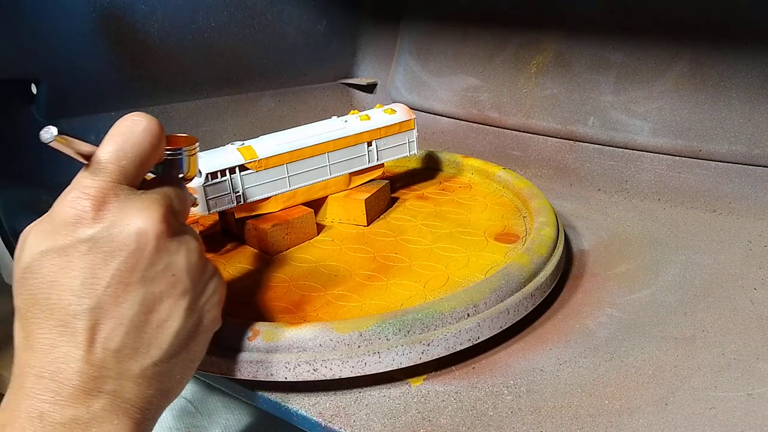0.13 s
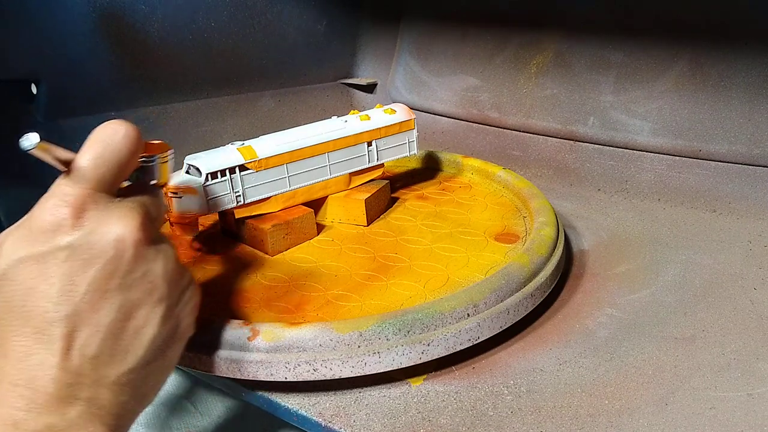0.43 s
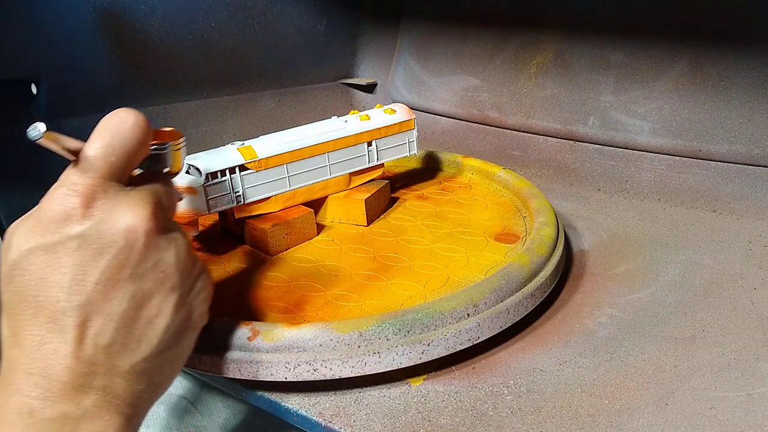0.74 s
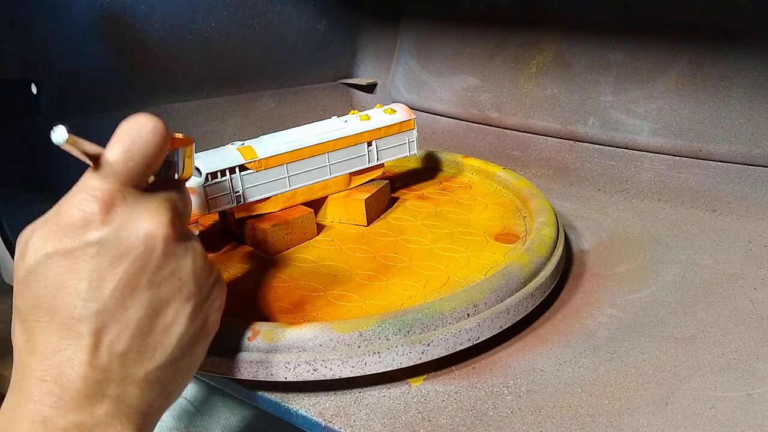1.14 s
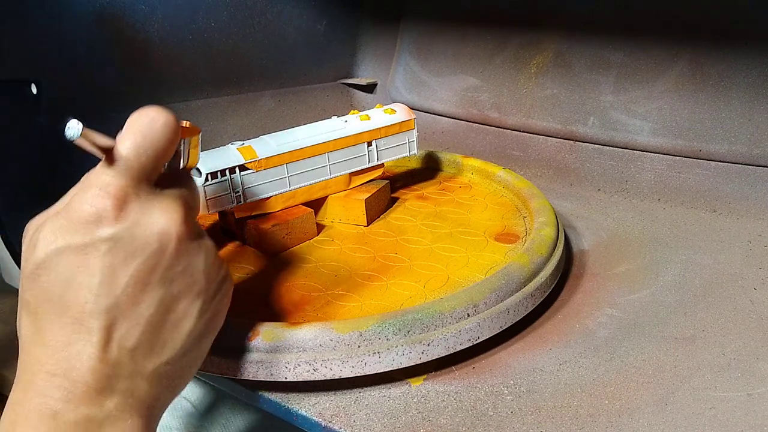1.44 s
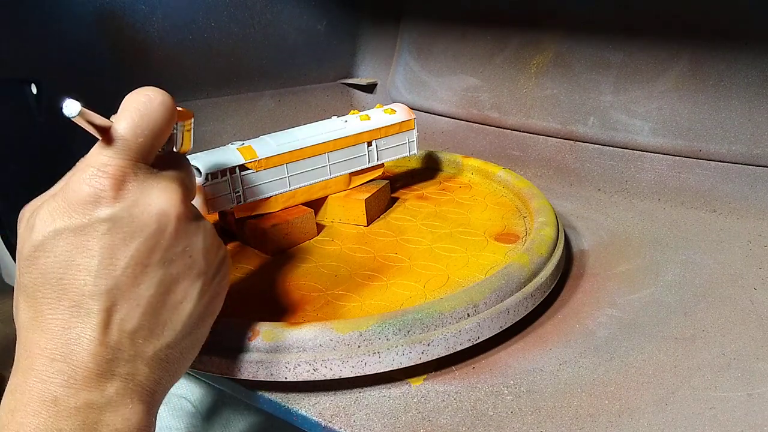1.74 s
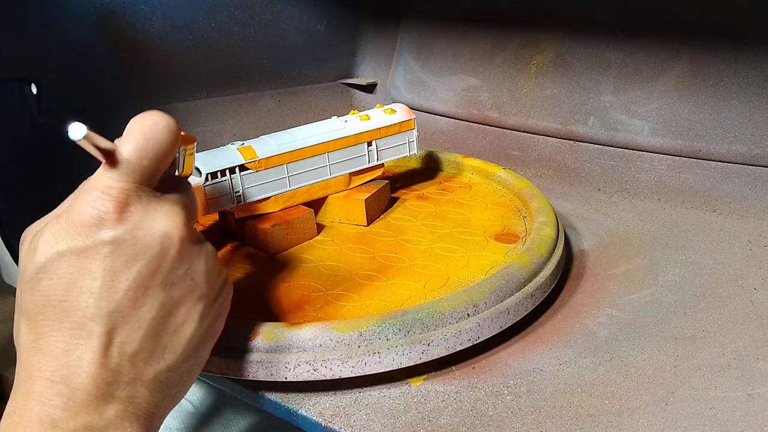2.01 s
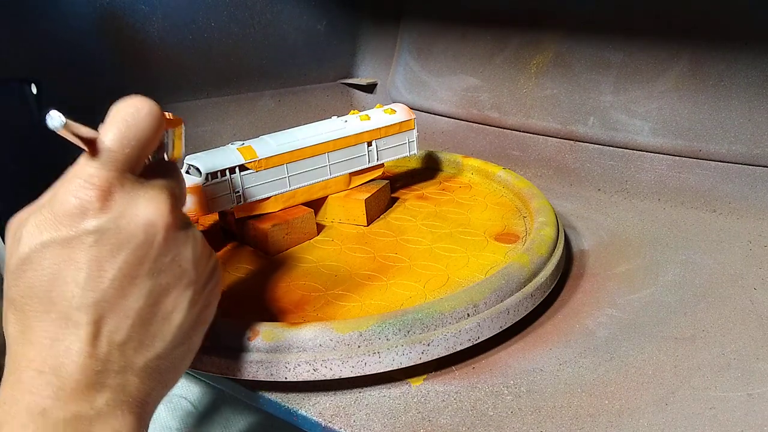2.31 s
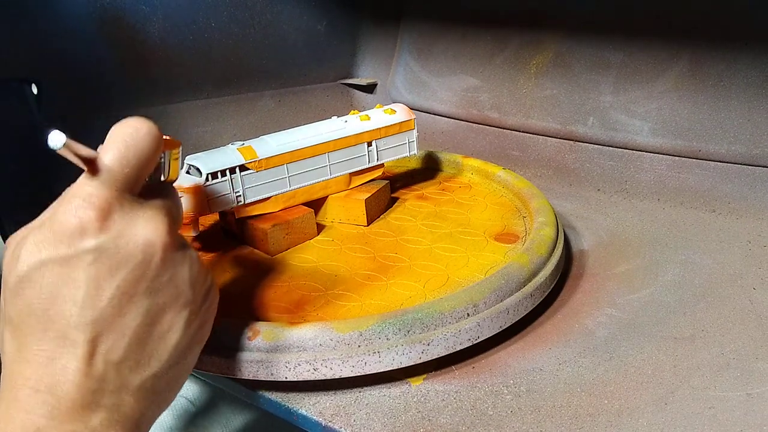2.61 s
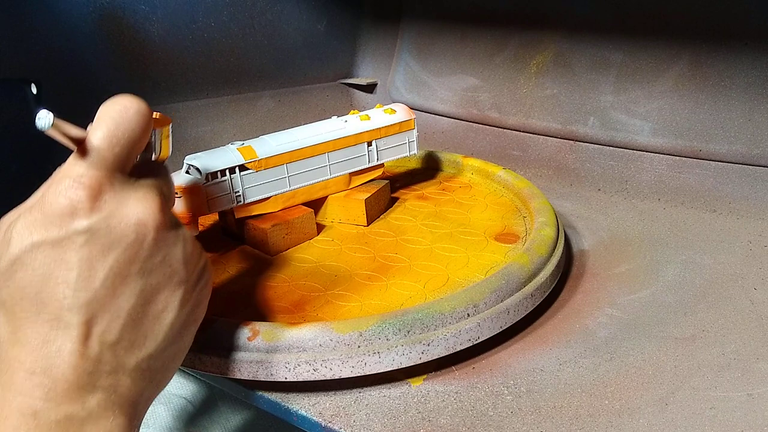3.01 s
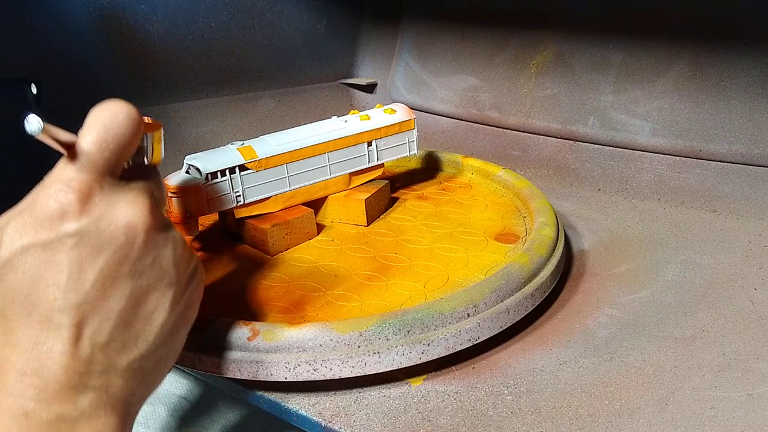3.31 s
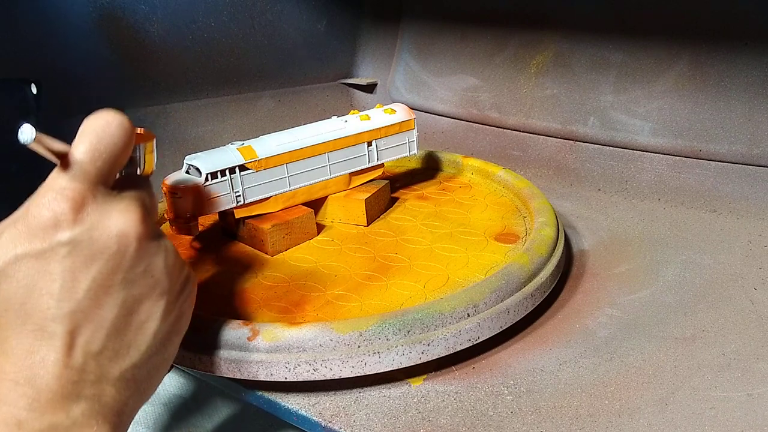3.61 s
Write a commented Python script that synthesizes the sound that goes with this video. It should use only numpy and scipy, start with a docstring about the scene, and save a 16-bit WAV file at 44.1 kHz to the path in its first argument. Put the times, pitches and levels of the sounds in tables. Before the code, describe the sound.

An airbrush hisses steadily inside a small spray booth over rushing air and a low hum.

```python
"""Air rushes through a small spray booth over a compressor's low hum, with the hiss of an airbrush close by.
The rush is noise shaped by booth resonances; the hum is a series of wavering harmonics.
The hiss is broadband jet noise with a sliding bright band, coloured by near reflections that shift with
the hand. The jet flares as it catches edges of the model being sprayed and rings across its hollow cab.
All the noise reaches a pair of microphones with a level, phase and coherence that depend on frequency."""
import sys
import numpy as np
from scipy import signal
from scipy.fft import rfft, irfft
from scipy.io import wavfile
from scipy.ndimage import map_coordinates

SR = 44100
rng = np.random.default_rng(int(sys.argv[2]) if len(sys.argv) > 2 else 0)


def transcribe(u):
    """Save the signal u as a 16-bit wav file named by the first command-line argument.

    u: samples, shape (n,) or (channels, n), limited to [-1, 1]; the rate is SR.
    q: integer samples, one column per channel.
    """
    v = np.clip(np.atleast_2d(u).T, -1, 1)
    q = np.round(v * 32767).astype(np.int16)
    wavfile.write(sys.argv[1], SR, q)


N = 165375  # samples, 3.75 s

# Compressor harmonics. Each row: multiple of the fundamental, relative left level in dB,
# relative right level in dB, phase lead of left over right in radians.
HUM_HARMONICS = [(1, -32.5, -43, -1.61), (2, -42.5, -51, -1.15), (3, -51, -51, 0.9), (4, -56.5, -68, -2.8),
                 (7, -60, -65, -0.14)]
# Slow course of the hum. Each row: time in seconds, relative level in dB.
HUM_COURSE = [(0.0, -43), (0.31, -38), (0.34, -40.5), (1.39, -39.5), (1.58, -40), (2.64, -41),
              (2.65, -42.5), (3.49, -42), (3.54, -41), (3.75, -43)]
# Spectrum of the rushing air. Each row: frequency in Hz, relative density in dB per Hz.
RUSH_SPECTRUM = [(20, -55), (45, -34), (65, -16), (100, -9), (135, -1), (205, 1), (310, -6), (520, -10.5),
                 (800, -10.5), (1150, -7.5), (1420, -14.5), (1680, -13.5), (2000, -20.5), (3000, -22),
                 (4300, -31), (8000, -37)]
# Slow course of the rush. Each row: time in seconds, relative level in dB.
RUSH_COURSE = [(0.0, -38.5), (0.3, -36.5), (0.34, -38.5), (0.49, -37.5), (0.55, -40.5), (0.74, -37.5),
               (0.81, -36.5), (0.85, -39), (1.21, -38), (1.36, -36), (1.51, -38.5), (2.35, -39),
               (2.5, -37.5), (2.6, -39.5), (2.75, -41.5), (2.88, -37.5), (2.92, -41.5), (3.1, -39),
               (3.75, -39.5)]
# Booth resonances and hollows. Each row: centre in Hz, width in Hz at half the lift, lift in dB.
BOOTH_MODES = [(396.6, 30, 5.5), (723.3, 24.4, 8.5), (760, 31, -2.5), (906, 36, 4), (952, 93, 4),
               (1067, 23, -4.5), (1120, 46, 1.5), (1298, 40, 5), (1472, 23, 4.5), (1605, 40, 4),
               (2420, 130, 4.5), (2714, 60, 4.5), (3820, 300, 2.5)]
# Spectrum of the jet on an edge. Each row: frequency in Hz, relative density in dB per Hz.
EDGE_SPECTRUM = [(400, -18), (1000, -18), (1500, 1), (2000, 7.5), (2550, 1), (3150, -2), (3800, -2.5),
                 (4400, -14), (6000, -19), (9000, -14.5), (15000, -40)]
# Resonances of the hollow cab. Each row: centre in Hz, width in Hz, relative peak level in dB.
CAB_RESONANCES = [(2650, 410, -1), (3673, 220, 0), (4130, 200, -2), (4580, 260, -2), (5800, 3000, -13.5)]
# Jet meeting an edge. Each row: centre in seconds, half length in seconds, level in dB,
# level of the cab's ring relative to that in dB.
EDGE_FLARES = [(0.132, 0.073, -40.5, -10.5), (0.488, 0.035, -38.2, -16), (0.651, 0.078, -44, -3),
               (0.892, 0.06, -43.5, -22), (1.29, 0.03, -38.5, -18), (1.43, 0.12, -43, -25),
               (1.79, 0.028, -42.5, -7), (2.137, 0.14, -44.5, -20), (2.286, 0.15, -48, -22),
               (3.138, 0.04, -45, -3), (3.5, 0.037, -39, -2.5), (3.57, 0.045, -43, -2.5),
               (3.639, 0.03, -40, -3)]
# Spectrum of the nozzle hiss. Each row: frequency in Hz, relative density in dB per Hz.
HISS_SPECTRUM = [(1500, -2.5), (3500, -5.5), (5500, 2), (7300, -1.5), (8800, -2.5), (10500, 2.5),
                 (12300, 2.5), (13400, 0), (14400, 0), (15300, -3)]
# Slow course of the hiss. Each row: time in seconds, relative level in dB.
HISS_COURSE = [(0.0, -52.5), (1.2, -54), (1.29, -51), (1.48, -53.5), (2.05, -54), (2.11, -52),
               (2.66, -54.5), (2.74, -55.5), (2.87, -55), (2.9, -55.5), (3.24, -53.5), (3.33, -57.5),
               (3.63, -52.5), (3.69, -56.5), (3.75, -53)]
# Bright band that slides as the nozzle turns. Each row: time in seconds, centre in Hz, level in dB.
BRIGHT_BAND = [(0, 12200, -54), (.4, 12100, -60), (.8, 11700, -56), (1.35, 10560, -56.5), (1.7, 10340, -56),
               (2.2, 10160, -56.5), (2.7, 9680, -56), (3.2, 9650, -56), (3.75, 10400, -59)]
# Peaks of the topmost treble. Each row: centre in Hz, width in Hz, relative peak level in dB.
SIZZLE_PEAKS = [(14000, 2600, 0), (15300, 700, -1)]
# Slow course of the topmost treble. Each row: time in seconds, relative level in dB.
SIZZLE_COURSE = [(0.0, -53.5), (1.97, -59.5), (2.26, -56), (2.99, -59), (3.23, -56), (3.33, -60),
                 (3.64, -55), (3.7, -61), (3.75, -59)]
# Brighter spurts of spray. Each row: centre in seconds, half length in seconds, level in dB.
SPRAY_SPURTS = [(0.563, .05, -49.5), (0.704, 0.063, -52.5)]
# Gain of each near reflection: left in dB, right in dB.
REFLECTION_DB = (-10.5, -11.5)
# Right microphone against left. Each row: frequency in Hz, gain in dB, phase lag in radians, coherence 0-1.
MICROPHONE_PAIR = [(100, -5, -2.5, 0.94), (196, -9, -1, 0.89), (420, -4, -0.1, 0.58),
                   (570, -1.5, -0.6, 0.73), (780, -3, 0, 0.87), (1000, -2.5, 0, 0.96),
                   (1260, -0.9, 0.16, 0.97), (1500, 0.7, 0.88, 0.83), (1800, -2, 2.5, 0.61),
                   (2150, -1.3, 3, 1), (2570, -3, 4, 0.75), (2890, -3.5, 5, 0.57), (3320, -0.5, 6.5, 0.96),
                   (3690, -4.5, 6.95, 0.77), (4050, -2, 8, 0.75), (4330, -5.5, 8.5, 1),
                   (4940, -1, 10.5, 0.7), (5760, -5.5, 12.5, 0.6), (7600, -8.5, 17, 0.7),
                   (10460, -10, 24.5, 0.9), (15300, -7, 37.5, .68)]

# Offsets added to the level courses, in dB
HUM_DB, RUSH_DB, HISS_DB, SIZZLE_DB = 39, 5, 6, 3
# Random wander: typical depth in dB, rate in knots per second
HUM_WAVER_DB, HUM_WAVER_PER_S = 1, 6.15
RUSH_FLUTTER_DB, RUSH_FLUTTER_PER_S = 0.45, 14
HISS_FLUTTER_DB, HISS_FLUTTER_PER_S = 1.07, 24.94
FLARE_FLUTTER_DB, FLARE_FLUTTER_PER_S = 1, 45  # the jet flaps on the edge
HUM_HZ, HUM_DRIFT, HUM_DRIFT_PER_S = 119.96, .001, 2.02  # drift is a fraction of the pitch
RIPPLE_DB, RIPPLE_HZ, RIPPLE_FULL_HZ = 1.4, 21.88, 1200  # small booth modes: depth, spacing, onset
EDGE_STEEPNESS = 3.1  # exponent of the swell: higher is more abrupt
BAND_WIDTH_HZ = 2100
SPURT_HZ, SPURT_WIDTH_HZ = 6760, 4700
REFLECTIONS, ECHO_MIN_S, ECHO_SPREAD_S = 6, 0.000801, .005  # count per side, shortest delay, range
SWAY_S, SWAY_PER_S = .000025, 1.505  # the hand's sway: typical delay shift, knots per second
TOP_HZ = 15500

TIME_S = np.arange(N) / SR
BIN_HZ = np.maximum(np.arange(N // 2 + 1) * SR / N, 1)  # kept above zero for logs and ratios


def undb(db):
    """Amplitude ratio is ten to the power of decibels over twenty."""
    return 10 ** (np.asarray(db) / 20)


def curve(at, rows, axis=1):
    """Linear interpolation of one table column against the first."""
    rows = np.array(rows, float)
    return np.interp(at, rows[:, 0], rows[:, axis])


def colour(rows):
    """Spectral envelope: gain per bin, in decibels linear over log frequency."""
    points = [(np.log(hz), db) for hz, db in rows]
    return undb(curve(np.log(BIN_HZ), points))


def bell(hz, width):
    """Second-order resonance: gain falls with detuning, by 3 dB at the edges of the width."""
    detuning = (BIN_HZ / hz - hz / BIN_HZ) * hz / width
    return 1 / np.hypot(1, detuning)


def resonances(rows):
    """Superposition of squared resonance gains."""
    return sum(undb(db) * bell(hz, width) ** 2 for hz, width, db in rows)


def walk(rate):
    """Smooth random fluctuation: a spline through normal knots, with spread near 1."""
    knots = rng.standard_normal(256)
    return map_coordinates(knots, [TIME_S * rate + 2], mode="mirror")


def swell(centre, half):
    """Flat-topped exponential envelope: a quick rise, a hold and a quick fall."""
    return np.exp(-np.abs((TIME_S - centre) / half) ** EDGE_STEEPNESS / 2)


def microphones(shared, own):
    """Partial coherence: the right signal mixes the left's noise, shifted in phase, with its own."""
    gain = undb(curve(BIN_HZ, MICROPHONE_PAIR))
    lag = curve(BIN_HZ, MICROPHONE_PAIR, axis=2)
    coherence = np.clip(curve(BIN_HZ, MICROPHONE_PAIR, axis=3), 0, 1)
    mixed = coherence * shared + np.sqrt(1 - coherence ** 2) * own
    right = mixed * gain * np.exp(-1j * lag)
    pair = irfft(np.array([shared, right]), N)
    return pair / pair[0].std()


def turbulence(gain):
    """Turbulent flow radiates broadband noise, here white noise under a given spectral gain."""
    shared, own = (rfft(rng.standard_normal(N)) * gain for _ in range(2))
    return microphones(shared, own)


def compressor():
    """A periodic motor radiates harmonics of one fundamental, here with slight pitch and level wander."""
    pitch = HUM_HZ * (1 + HUM_DRIFT * walk(HUM_DRIFT_PER_S))
    phase = 2 * np.pi * np.cumsum(pitch) / SR
    hum = 0
    for multiple, left_db, right_db, lead in HUM_HARMONICS:
        turn = multiple * phase + 2 * np.pi * rng.random()
        left = undb(left_db) * np.sin(turn)
        right = undb(right_db) * np.sin(turn - lead)
        waver = undb(HUM_WAVER_DB * walk(HUM_WAVER_PER_S))
        hum = hum + np.sqrt(2) * np.array([left, right]) * waver  # root 2 turns RMS into peak
    return hum * undb(curve(TIME_S, HUM_COURSE) + HUM_DB)


def booth_colour():
    """Enclosure modes: a few strong resonances and hollows over a dense random ripple."""
    knots = rng.standard_normal(4096)
    ripple = map_coordinates(knots, [BIN_HZ / RIPPLE_HZ], mode="mirror")
    density = np.minimum(BIN_HZ / RIPPLE_FULL_HZ, 1)
    strong_db = sum(db * bell(hz, width) ** 2 for hz, width, db in BOOTH_MODES)
    return undb(strong_db + RIPPLE_DB * density * ripple)


def booth_rush(walls):
    """Flow noise filtered by the modes of the enclosure through which the air rushes."""
    flutter_db = RUSH_FLUTTER_DB * walk(RUSH_FLUTTER_PER_S)
    level = undb(curve(TIME_S, RUSH_COURSE) + RUSH_DB + flutter_db)
    return turbulence(colour(RUSH_SPECTRUM) * walls) * level


def flares(walls):
    """Edge noise and cavity resonance: the jet breaks on edges and blows across the hollow cab."""
    # overlapping flares add in power
    edge = sum((undb(db) * swell(at, half)) ** 2 for at, half, db, ring_db in EDGE_FLARES)
    ring = sum((undb(db + ring_db) * swell(at, half)) ** 2 for at, half, db, ring_db in EDGE_FLARES)
    broken_jet = turbulence(colour(EDGE_SPECTRUM) * walls) * np.sqrt(edge)
    cab = turbulence(resonances(CAB_RESONANCES) * walls) * np.sqrt(ring)
    return (broken_jet + cab) * undb(FLARE_FLUTTER_DB * walk(FLARE_FLUTTER_PER_S))


def sliding_noise(carrier):
    """Quadrature modulation moves low-pass noise up to the carrier; returns its spectrum."""
    lowpass = 1 / (1 + (2 * BIN_HZ / BAND_WIDTH_HZ) ** 4)
    narrow = irfft(rfft(rng.standard_normal((2, N))) * lowpass, N)
    return rfft((narrow * carrier).sum(axis=0))


def bright_band():
    """Narrow-band noise whose centre frequency slides, mostly downward, as the nozzle turns."""
    phase = 2 * np.pi * np.cumsum(curve(TIME_S, BRIGHT_BAND)) / SR
    carrier = np.cos(phase + np.array([[0], [np.pi / 2]]))
    shared, own = (sliding_noise(carrier) for _ in range(2))
    return microphones(shared, own) * undb(curve(TIME_S, BRIGHT_BAND, axis=2))


def reflect(pair):
    """Comb filtering: near reflections with delays that drift with the hand send ripples through the hiss."""
    out, samples = pair.copy(), np.arange(N)
    for side in range(2):
        for _ in range(REFLECTIONS):
            delay = ECHO_MIN_S + ECHO_SPREAD_S * rng.random() + SWAY_S * walk(SWAY_PER_S)
            echo = map_coordinates(pair[side], [samples - delay * SR], order=3, mode="wrap")
            out[side] += undb(REFLECTION_DB[side]) * echo
    return out / out[0].std()


def nozzle():
    """Jet noise: a broadband hiss with a sliding band, a sizzle on top and brief spurts, then reflected."""
    flutter_db = HISS_FLUTTER_DB * walk(HISS_FLUTTER_PER_S)
    hiss_level = undb(curve(TIME_S, HISS_COURSE) + HISS_DB + flutter_db)
    hiss = turbulence(colour(HISS_SPECTRUM)) * hiss_level
    sizzle_level = undb(curve(TIME_S, SIZZLE_COURSE) + SIZZLE_DB)
    sizzle = turbulence(resonances(SIZZLE_PEAKS)) * sizzle_level
    spurt_level = sum(undb(db) * swell(at, half) for at, half, db in SPRAY_SPURTS)
    spurts = turbulence(bell(SPURT_HZ, SPURT_WIDTH_HZ) ** 2) * spurt_level
    spray = hiss + sizzle + spurts + bright_band()
    return reflect(spray) * spray[0].std()  # the left keeps its level before reflection


def scene():
    """Linear superposition of compressor, booth and airbrush."""
    walls = booth_colour()
    return compressor() + booth_rush(walls) + flares(walls) + nozzle()


def record(dry):
    """Band limiting: the recorder's steep elliptic low-pass cuts the top."""
    lowpass = signal.ellip(12, .2, 80, TOP_HZ, fs=SR, output="sos")  # ripple and stop depth in dB
    return signal.sosfilt(lowpass, dry)


dry = scene()
out = record(dry)
transcribe(out)
```